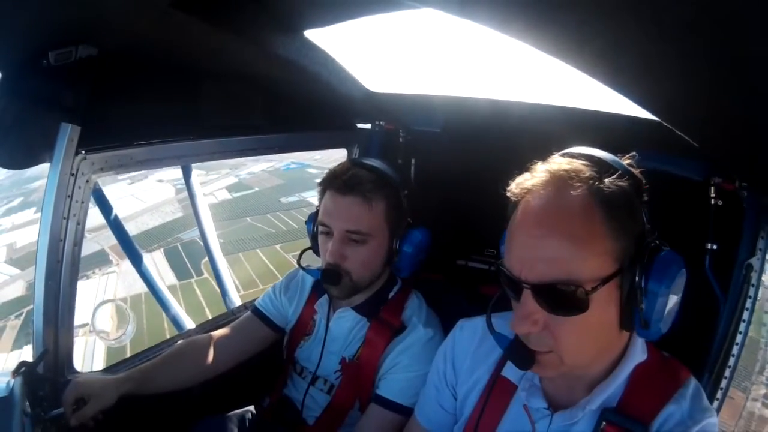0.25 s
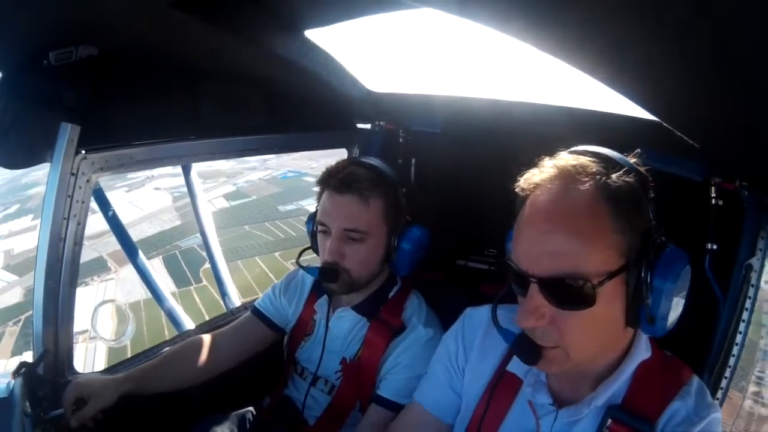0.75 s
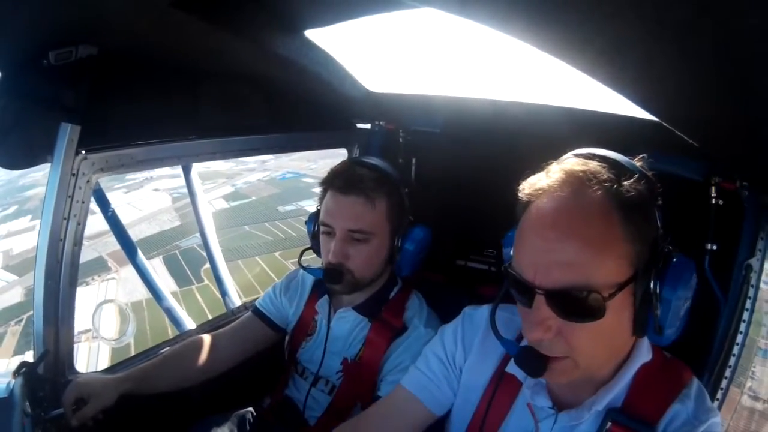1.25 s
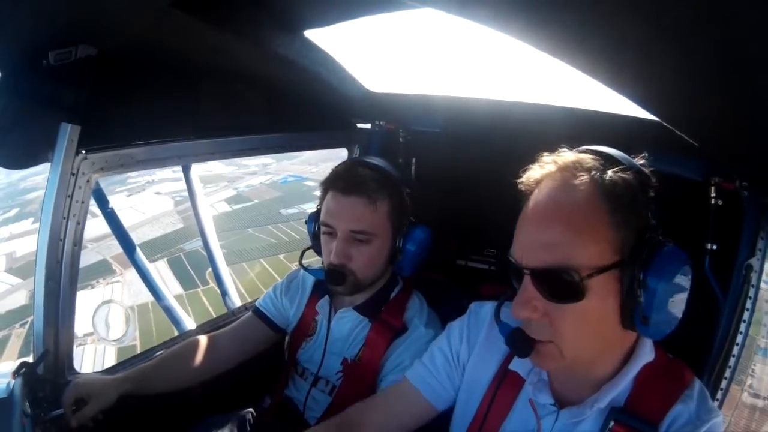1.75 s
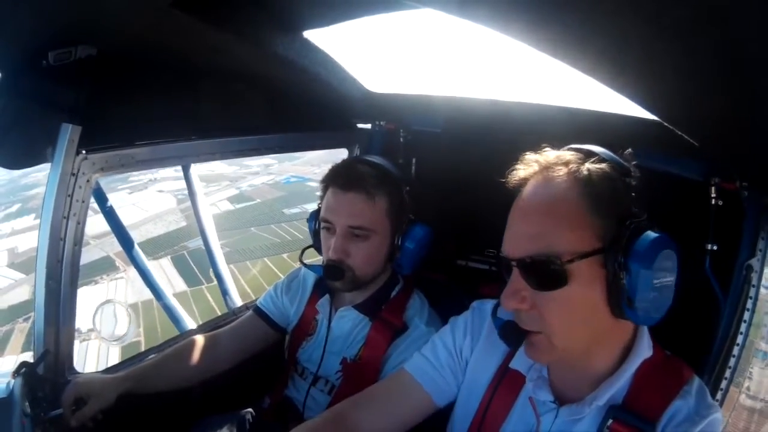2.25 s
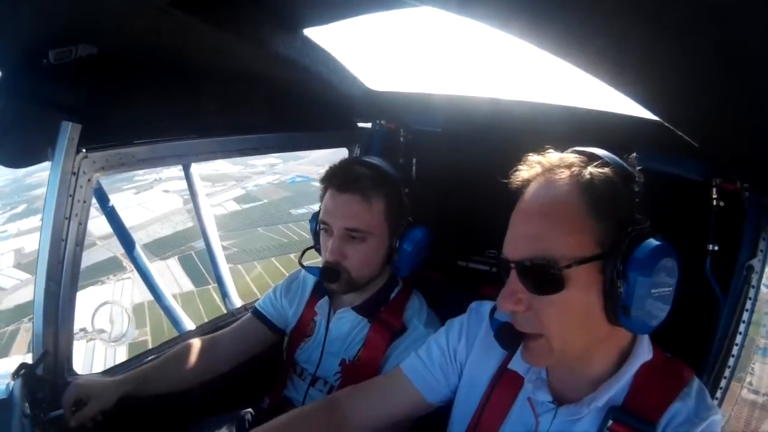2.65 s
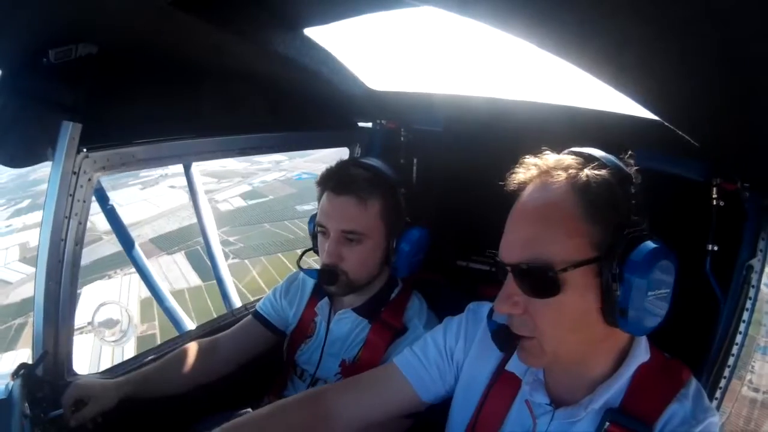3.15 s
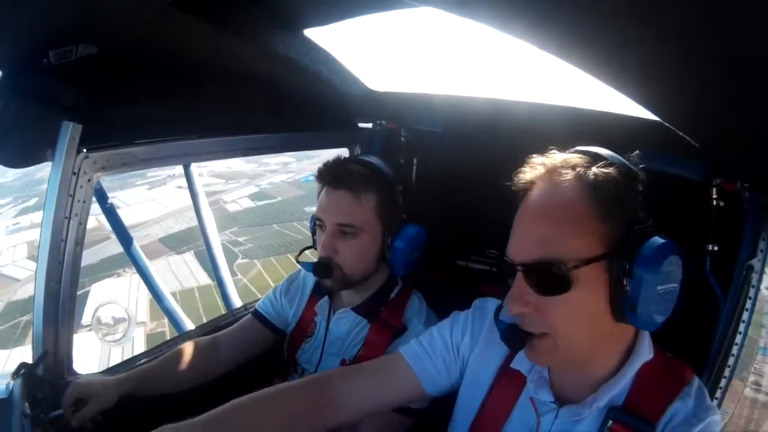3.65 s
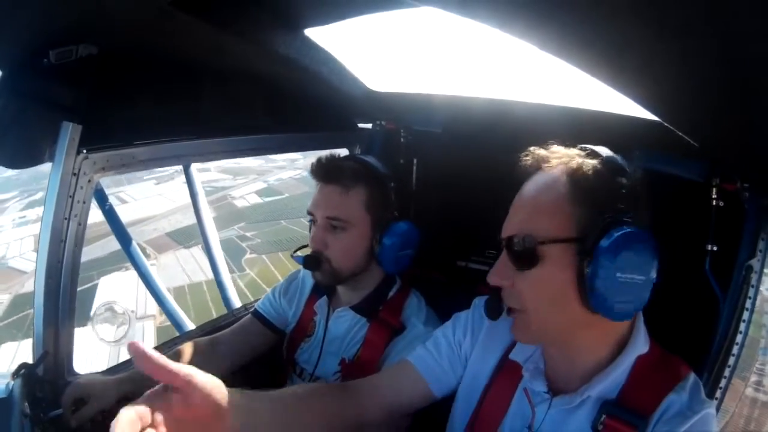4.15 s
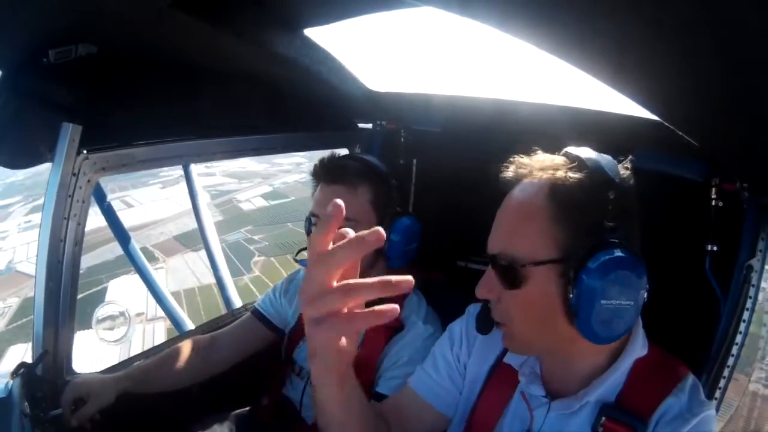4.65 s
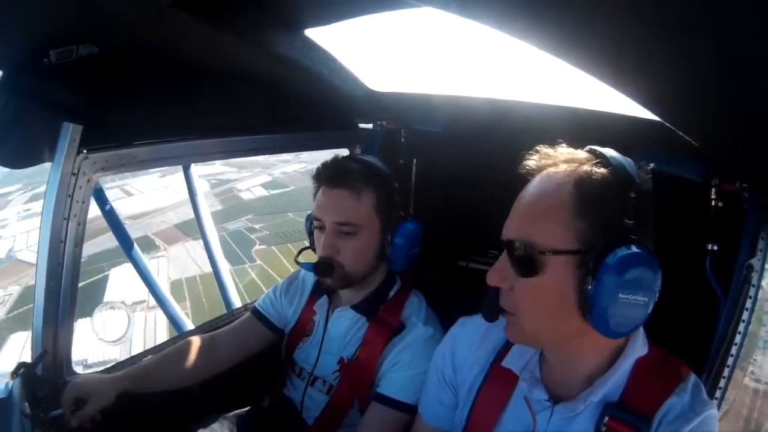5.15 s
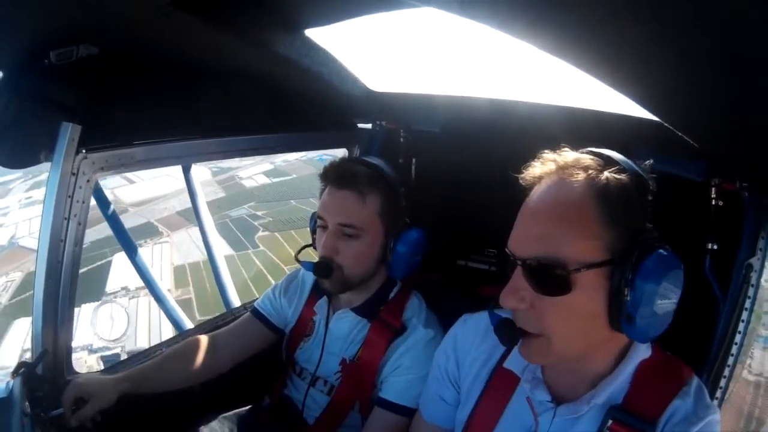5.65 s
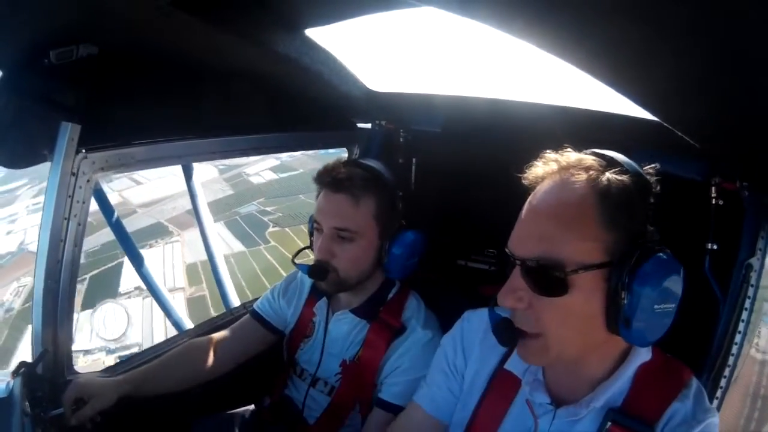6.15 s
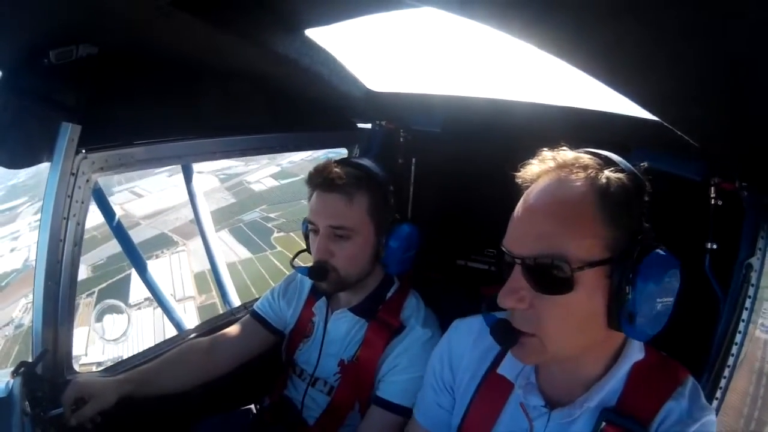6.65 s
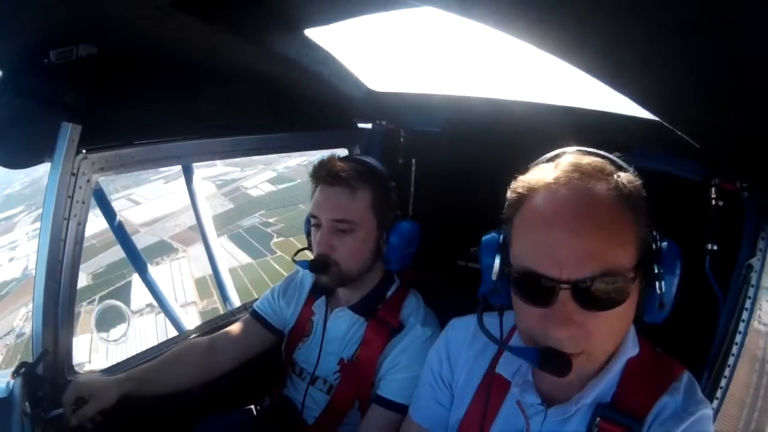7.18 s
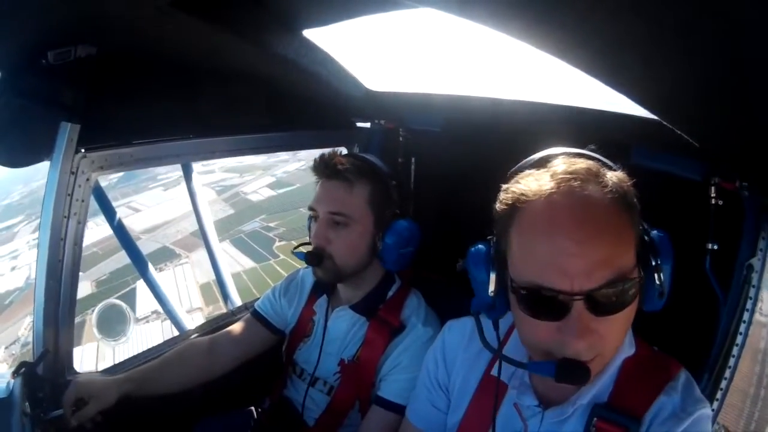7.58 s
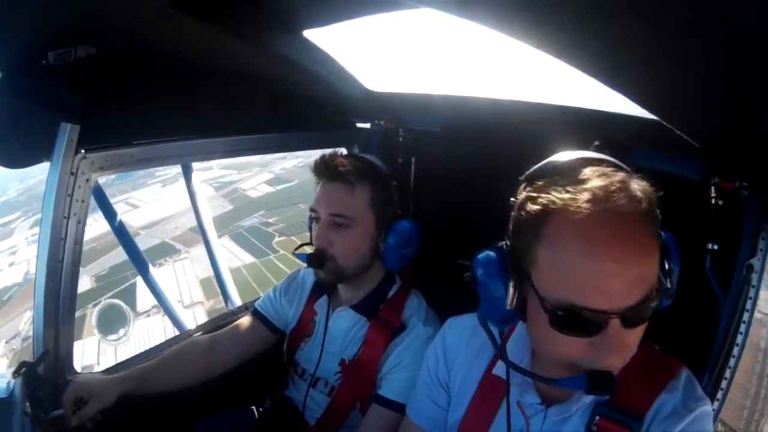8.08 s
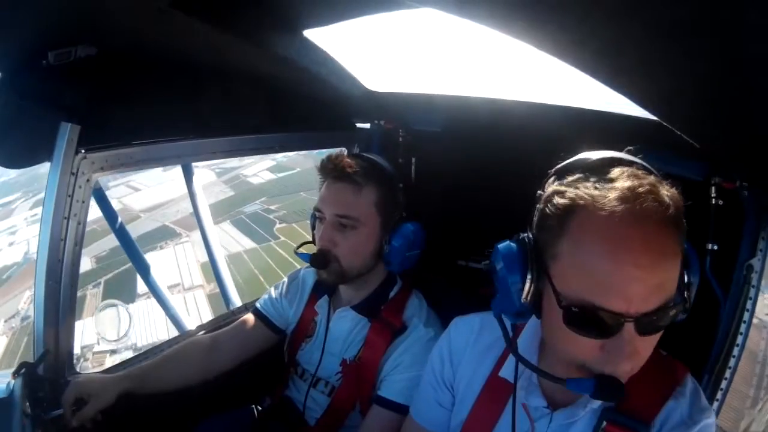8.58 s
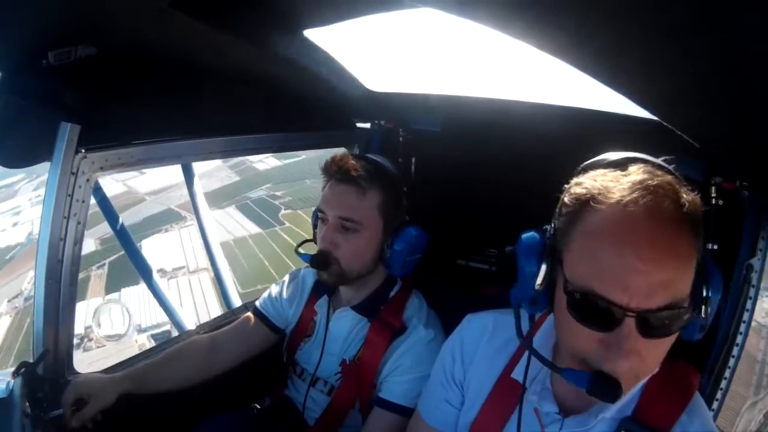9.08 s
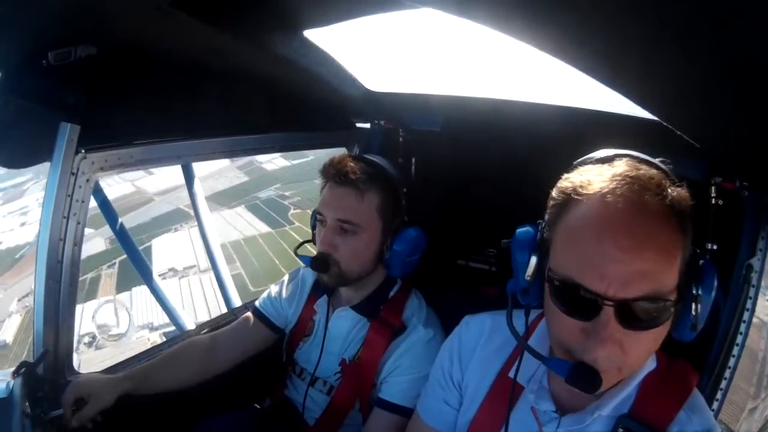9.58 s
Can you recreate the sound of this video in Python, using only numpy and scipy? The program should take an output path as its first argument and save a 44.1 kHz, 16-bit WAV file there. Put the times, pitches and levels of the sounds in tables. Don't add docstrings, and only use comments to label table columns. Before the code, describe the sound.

In the cramped cabin of a light aircraft, a low buzzing engine drone runs without a break, blended with propeller hum and a thick slipstream roar. Irregular gusts make the cabin boom and its thin panels drum, and the overall level dips briefly and recovers. The engine sags very slightly later and rasps harder. The close microphone is muffled, with little treble, a faint window hiss, and a sudden end.

```python
import sys
import numpy as np
from scipy import signal
from scipy.fft import rfft, irfft, next_fast_len
from scipy.io import wavfile
from scipy.ndimage import uniform_filter1d

SR = 44100
rng = np.random.default_rng(int(sys.argv[2]) if len(sys.argv) > 2 else 0)


def invert_db(level):
    return 10 ** (np.asarray(level, dtype=float) / 20)


def unload_wav(signal):
    wavfile.write(
        sys.argv[1],
        SR,
        np.round(np.clip(np.atleast_2d(signal).T, -1, 1) * 32767).astype(np.int16),
    )


N = 433062


def in_time(rows):
    s, *columns = np.transpose(rows)
    return [np.interp(np.arange(N) / SR, s, c) for c in columns]


def drift(rate_hz):
    r = np.exp(-128 * np.pi * rate_hz / SR)
    settle = 4000
    slow = signal.lfilter([1], [1, -2 * r, r * r], rng.standard_normal(N // 64 + settle + 2))[settle:]
    return (slow - slow.mean()) / slow.std()


def fine(coarse):
    return np.interp(np.arange(N) / 64, np.arange(len(coarse)), coarse)


def noise(density):
    size = next_fast_len(N)
    hz = np.maximum(np.arange(size // 2 + 1) * SR / size, 1)
    white = rfft(rng.standard_normal(size))
    return irfft(white * np.sqrt(density(hz) * SR / 2), size)[:N]


def coloured(points):
    hz, db = np.transpose(points)

    def density(f):
        return invert_db(np.interp(np.log(f), np.log(hz), db, left=-200, right=-200)) ** 2
    return noise(density)


# (time [s], four-stroke cycle rate [Hz])
ENGINE_SPEED = [(0.0, 45.195), (0.8, 45.204), (1.2, 45.334), (2.0, 45.226), (3.2, 45.4), (4.2, 45.28),
                (5.6, 45.37), (6.4, 45.285), (6.8, 45.155), (7.2, 45.18), (7.6, 45.066), (8.4, 45.117),
                (9.82, 45.115)]


def engine_speed():
    return in_time(ENGINE_SPEED)[0]


ORDER_LEVELS = [-44, -32.5, -28.5, -24, -38, -29, -50.5, -42, -69.5, -57.5, -45, -39, -55, -49.5, -42.5,
                -44, -48.5, -41, -58, -78, -47, -45, -51, -51, -73, -48.5, -40.5, -35.5, -59.5, -52, -61.5,
                -51.5, -60, -48, -57.5, -42, -57, -47.5, -47.5, -67.5, -56.5, -53.5, -58.5, -47, -60, -54,
                -67.5, -52.5, -62, -63, -69.5, -56.5, -73.5, -69.5, -68.5, -68]
# (time [s], level [dB])
CABIN_FLEX = [(0.0, -31.5), (0.02, -29.5), (1.2, -30), (1.39, -41), (1.45, -29), (1.75, -32.5), (3.25, -31),
              (3.36, -41.5), (3.85, -27.5), (6.04, -28.5), (6.83, -27.5), (7.08, -41), (7.11, -28.5),
              (9.16, -31), (9.19, -27.5), (9.82, -28.5)]


def engine(cycles, speed):
    flex_order, rasp_from_order = 6, 34
    rasp = invert_db(0.17 + 13.5 * (speed.max() - speed))
    flex_db = in_time(CABIN_FLEX)[0]
    flex = invert_db(flex_db - flex_db.mean() + fine(1.6 * drift(7.0)))
    out = np.zeros(N)
    for order, db in enumerate(ORDER_LEVELS, start=1):
        phase = 2 * np.pi * (order * cycles + 0.59 * rng.random()) + fine(0.16 * drift(1.2))
        breath_db = 1.4 * drift(0.8)
        tone = np.sqrt(2) * fine(invert_db(db + breath_db)) * np.sin(phase)
        if order >= rasp_from_order:
            tone *= rasp
        elif order == flex_order:
            tone *= flex
        out += tone
    return out


# (multiple of shaft rate, rms level [dB])
BLADE_TONES = [
    (1, -45),
    (4, -33),
    (6, -29),
    (9, -42),
    (12, -44),
    (13, -48),
    (15, -42),
    (18, -43),
    (27, -53),
]


def propeller(cycles):
    turns_per_cycle = 0.5762
    shaft = 2 * np.pi * turns_per_cycle * cycles + fine(0.12 * drift(1.2))
    out = np.zeros(N)
    for multiple, db in BLADE_TONES:
        level = fine(invert_db(db + 2.2 * drift(1.0)))
        out += np.sqrt(2) * level * np.sin(multiple * shaft + multiple)
    return out


# (time [s], level [dB])
SLIPSTREAM = [(0.0, 2), (0.5, 1.5), (1.15, 1), (1.7, -0.5), (2.3, 1), (3.2, 0.3), (4.0, 0.5), (4.8, -0.5),
              (5.6, -0.5), (5.85, -0.5), (6.05, 2), (6.6, 0.56), (7.45, -0.5), (7.75, 1.8), (8.4, 0.6),
              (9.0, -0.85), (9.45, 1.5), (9.82, -2)]


def slipstream_db():
    return in_time(SLIPSTREAM)[0]


def crank_throb(cycles):
    return invert_db(1.1 * np.sin(4 * np.pi * cycles))


# (frequency [Hz], level [dB per Hz])
LOW_ROAR = [(20, -66.5), (35, -69.5), (50, -54.5), (75, -45), (100, -42), (118, -46.5), (150, -43),
            (165, -43), (195, -51), (280, -49.5), (300, -54), (500, -55), (560, -63), (650, -61)]
# (frequency [Hz], level [dB per Hz])
MID_ROAR = [(650, -64.5), (700, -60.5), (860, -65.5), (1100, -62), (1250, -56), (1420, -64.5),
            (1620, -60.5), (1900, -63), (2030, -72), (2180, -68.5), (2300, -77), (2480, -74.5),
            (2580, -86.5), (2720, -91)]


def slipstream_roar(cycles, throb):
    lead_cycles, pulse_db = 0.4, 0.3
    low = coloured(LOW_ROAR) * fine(invert_db(1.6 * drift(5.7)))
    pulse = invert_db(pulse_db * np.sin(2 * np.pi * (cycles + lead_cycles)))
    return low + coloured(MID_ROAR) * throb * pulse


# (frequency [Hz], level [dB per Hz])
LEAK_SPECTRUM = [(2600, -100), (2900, -83.5), (3150, -90), (3320, -95.5), (3450, -91), (3960, -88.5),
                 (4150, -93.5), (4400, -100), (4620, -92), (4750, -103), (4850, -100), (5350, -104),
                 (5600, -110), (6300, -118.5)]


def window_leak(cycles, throb, mid_db, drum_power):
    puff_db = 4.0 * fine(drum_power / drum_power.max())
    level_db = 2 + 1.2 * mid_db + puff_db + fine(0.8 * drift(6.8))
    pulse = throb ** 0.4 * invert_db(0.28 * np.sin(2 * np.pi * cycles))
    return invert_db(level_db) * pulse * coloured(LEAK_SPECTRUM)


def gusts(rows):
    stretch = 0.89
    t = np.arange(N // 64 + 2) * 64 / SR
    power = np.zeros(len(t))
    for s, db, length in rows:
        power += invert_db(db) ** 2 * np.exp(-np.log(2) * (2 * (t - s) / (stretch * length)) ** 2)
    return power


def over_lull(power, lull_db, swing_db, rate_hz):
    lull = invert_db(lull_db + swing_db * drift(rate_hz)) ** 2
    return fine(10 * np.log10(power + lull))


def buffet(modes, level_db, even_s):
    def density(f):
        return sum(invert_db(db) ** 2 / (1 + (2 * (f - hz) / width) ** 2) ** 2 for hz, width, db in modes)
    ring = noise(density)
    power = uniform_filter1d(ring ** 2, max(int(even_s * SR), 1))
    return invert_db(level_db) * ring / np.sqrt(power + 0.071 * power.mean())


# (time [s], peak level [dB], length [s])
BOOM_SWELLS = [(0.16, -16, 0.04), (0.84, -22, 0.1), (1.24, -11, 0.076), (1.96, -26, 0.039),
               (2.55, -18.5, 0.036), (2.77, -24, 0.077), (3.14, -27, 0.045), (3.35, -18.5, 0.08),
               (3.71, -20.5, 0.04), (3.98, -22, 0.06), (4.2, -17.5, 0.05), (4.6, -19, 0.085),
               (4.82, -17.5, 0.11), (4.99, -21, 0.037), (5.1, -22, 0.083), (5.26, -13.5, 0.065),
               (5.82, -18.5, 0.059), (6.42, -17, 0.054), (6.78, -15, 0.07), (7.07, -15.5, 0.038),
               (7.21, -14, 0.06), (7.39, -20.5, 0.15), (7.56, -22, 0.04), (7.68, -20, 0.05),
               (7.87, -23, 0.05), (8.5, -16.5, 0.066), (8.81, -16.5, 0.061), (9.13, -24.5, 0.07),
               (9.46, -14, 0.035), (9.58, -16.5, 0.15)]
# (frequency [Hz], width [Hz], level [dB])
BOOM_MODES = [
    (63.9, 7.8, 0.5),
    (60.2, 6, -4),
]


def cabin_boom(level_db):
    return buffet(BOOM_MODES, level_db - 0.7, even_s=0.07)


# (time [s], peak level [dB], length [s])
DRUM_SWELLS = [(0.64, -13.5, 0.013), (0.9, -12, 0.077), (1.17, -12.5, 0.045), (1.53, -11.5, 0.059),
               (1.9, -13.5, 0.026), (2.36, -20.5, 0.028), (2.52, -14.5, 0.033), (3.34, -13.5, 0.06),
               (3.79, -12, 0.079), (3.93, -10.5, 0.039), (4.17, -19, 0.022), (4.37, -12.5, 0.041),
               (4.8, -14, 0.03), (5.26, -17, 0.031), (5.4, -13, 0.037), (5.54, -16, 0.036),
               (6.1, -13, 0.059), (6.33, -12, 0.032), (6.69, -14.5, 0.013), (6.88, -14.5, 0.042),
               (7.43, -14.5, 0.032), (8.01, -13, 0.05), (8.16, -15.5, 0.071), (8.31, -14.5, 0.034),
               (8.5, -15.5, 0.067), (8.72, -16.5, 0.017), (8.95, -16, 0.09), (9.53, -19, 0.05),
               (9.64, -15, 0.014), (9.79, -17.5, 0.027)]
# (frequency [Hz], width [Hz], level [dB])
DRUM_MODES = [
    (126.8, 4, -1.5),
    (136.8, 18, -1.5),
    (142.65, 0.96, 0),
]


def panel_drum(level_db):
    return buffet(DRUM_MODES, level_db + 0.5, even_s=0.034)


def ducking(loud_db):
    above_db, share, attack_s, recover_db_per_s = -15.5, 0.75, 0.01, 8.5
    recovery = recover_db_per_s * np.arange(N) / SR
    over = share * np.maximum(loud_db - above_db, 0)
    held = np.maximum.accumulate(over + recovery) - recovery
    r = np.exp(-1 / (attack_s * SR))
    return -signal.lfilter([1 - r], [1, -r], held)


def scene():
    speed = engine_speed()
    cycles = np.cumsum(speed) / SR
    throb = crank_throb(cycles)
    boom_power, drum_power = gusts(BOOM_SWELLS), gusts(DRUM_SWELLS)
    boom_db = over_lull(boom_power, lull_db=-25.0, swing_db=3.0, rate_hz=10.0)
    drum_db = over_lull(drum_power, lull_db=-24.5, swing_db=4.0, rate_hz=10.0)
    gust_db = fine(10 * np.log10(boom_power + drum_power + 1e-9))
    mid_db = slipstream_db() + ducking(gust_db)
    hum = engine(cycles, speed) + propeller(cycles)
    cabin = invert_db(mid_db) * (hum + slipstream_roar(cycles, throb))
    leak = window_leak(cycles, throb, mid_db, drum_power)
    shaken = cabin_boom(boom_db) + panel_drum(drum_db)
    return (cabin + leak + shaken)[None]


# (frequency [Hz], level [dB])
MIRROR_LEAK = [(13500, -38.5), (14000, -38.5), (14370, -42), (14730, -49), (14950, -61), (15190, -56.5),
               (15500, -72)]


def mirror_image(dry):
    folded = rfft(dry * np.cos(2 * np.pi * 16000 * np.arange(N) / SR))
    hz, db = np.transpose(MIRROR_LEAK)
    leak_db = np.interp(np.arange(N // 2 + 1) * SR / N, hz, db, left=-200, right=-200)
    return irfft(folded * invert_db(leak_db), N)


# (frequency [Hz], level [dB per Hz])
HISS_SPECTRUM = [(3000, -111), (6500, -111), (8000, -110.5), (10000, -113), (14000, -116), (15000, -118),
                 (15700, -128)]


def preamp_hiss():
    return invert_db(0.3 * slipstream_db()) * coloured(HISS_SPECTRUM)


def low_pass(x):
    return signal.sosfilt(signal.butter(12, 15740, fs=SR, output="sos"), x)


def record(dry):
    rounded = 1.213 * np.tanh(dry / 1.197)
    fade = np.minimum((N - np.arange(N)) / 200, 1)
    mix = (rounded + mirror_image(dry) + preamp_hiss()) * fade
    return low_pass(mix)


dry = scene()
out = record(dry)
unload_wav(out)
```